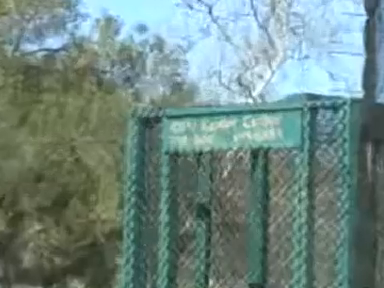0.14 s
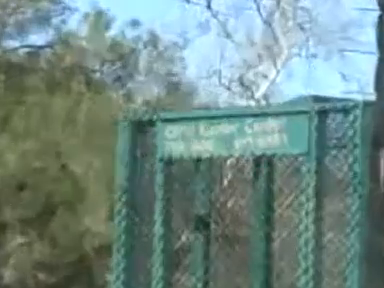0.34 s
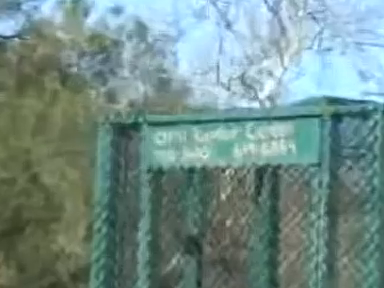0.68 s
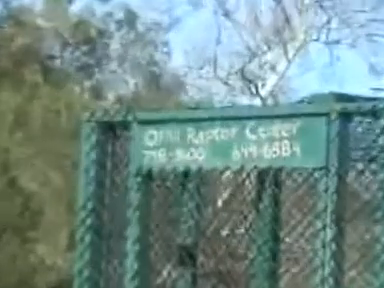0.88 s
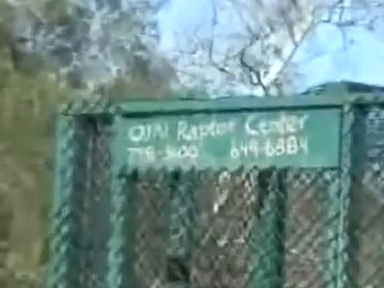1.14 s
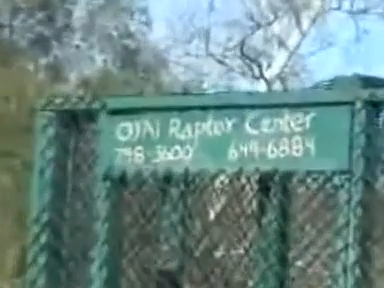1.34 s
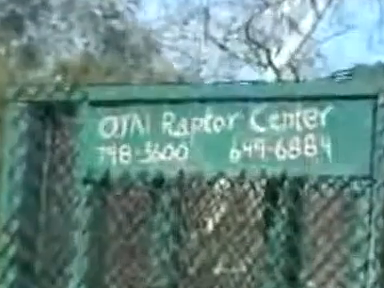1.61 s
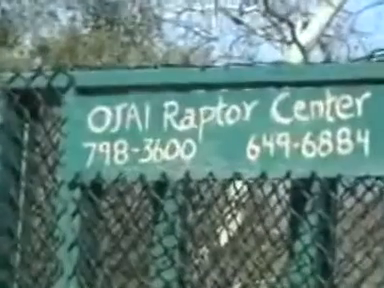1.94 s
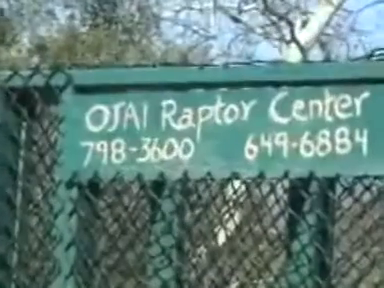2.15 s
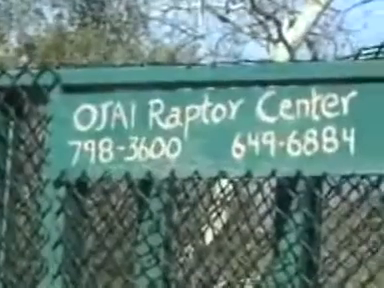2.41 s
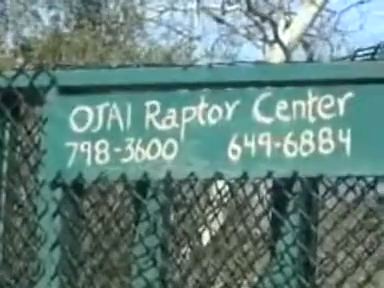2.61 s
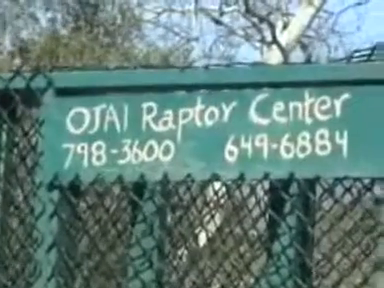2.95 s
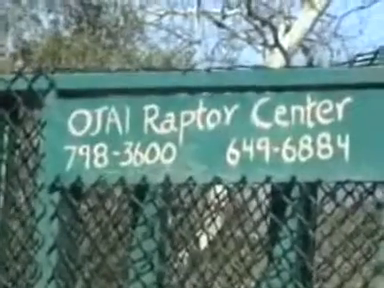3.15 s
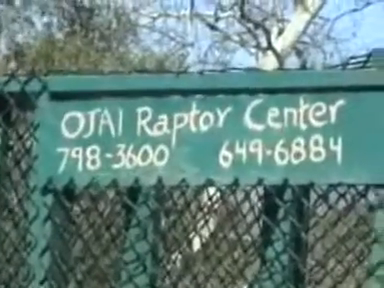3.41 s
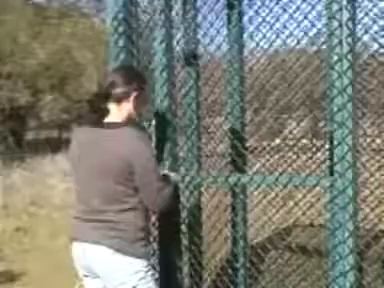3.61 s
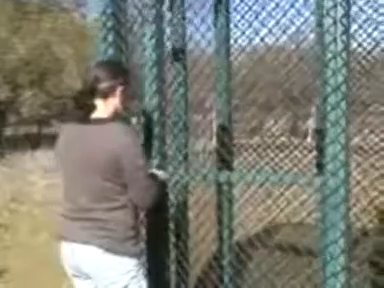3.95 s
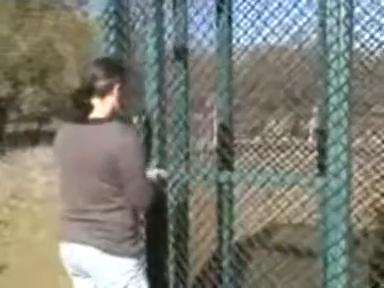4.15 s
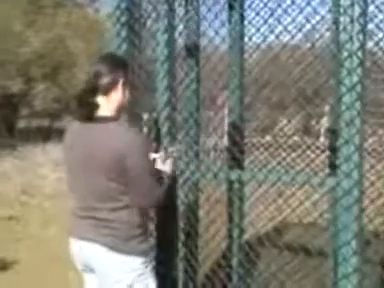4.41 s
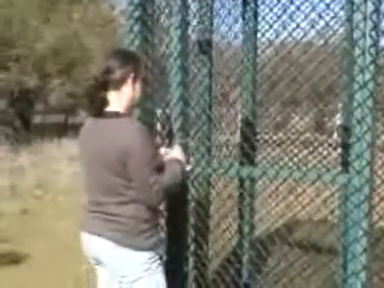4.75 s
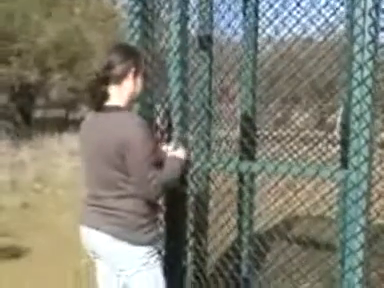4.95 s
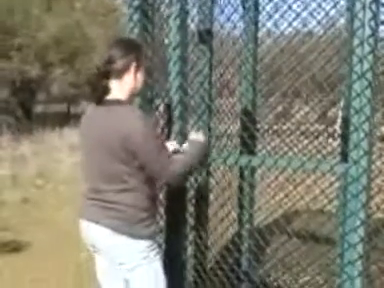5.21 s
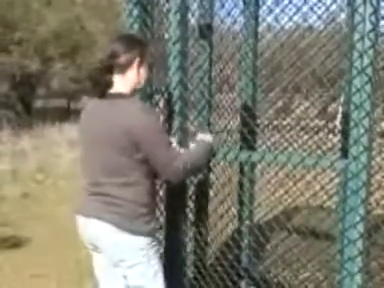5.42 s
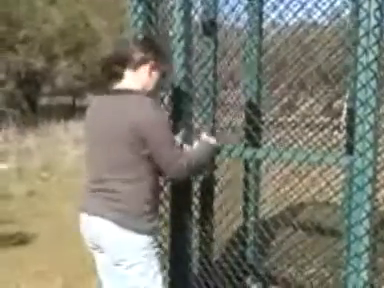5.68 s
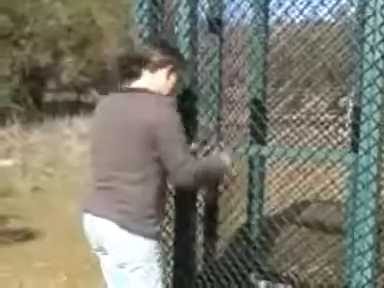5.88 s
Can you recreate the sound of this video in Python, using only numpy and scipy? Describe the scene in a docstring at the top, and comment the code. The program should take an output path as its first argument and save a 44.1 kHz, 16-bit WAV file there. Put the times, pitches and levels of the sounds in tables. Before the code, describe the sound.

Outdoors, a small camera microphone picks up steady hiss and a faint wavering motor hum. A steel frame bumps out of sight, then slams loudly, with tiny metallic ticks after. Following a quiet gap, a nearby latch clanks in a quick bright cluster, with small bolt pings and shivering wire mesh. A lull with low wind buffeting follows, then lighter clicks and rattles as the chain-link door moves.

```python
"""A steel-framed door bumps and slams out of sight among chain-link cages outdoors, and small things tick;
then a hand works a latch and the door rattles open. Each blow is filtered noise that also rings steel modes,
the bolt pings as decaying sines and the handled mesh shivers as uneven noise. Wind buffets the microphone and
rustles nearby as shaped noise; the camcorder's own motors hum as wavering sines over its hiss."""
import sys
import numpy as np
from scipy import signal
from scipy.fft import rfft, irfft
from scipy.io import wavfile
from scipy.ndimage import uniform_filter1d

SR = 44100
rng = np.random.default_rng(int(sys.argv[2]) if len(sys.argv) > 2 else 0)


def persist_wave(psi):
    """Save psi, clipped to +-1, as 16-bit WAV."""
    counts = np.round(np.clip(psi, -1, 1) * 32767).astype(np.int16)
    wavfile.write(sys.argv[1], SR, np.atleast_2d(counts).T)


N = 267201
T = np.arange(N) / SR
OPPOSITE = np.array([[1], [-1]])  # adds to the left, subtracts from the right: widens the image

# resonances of the steel latch: f/Hz, level/dB (relative), t60/s
LATCH_MODES = [(810, 0, .06), (1480, 5, .06), (1870, 2, .06), (2090, 1, .06), (2780, 0, .05),
               (3340, 0, .05), (3880, 4, .05), (4760, -3, .04), (6120, 2, .04), (7150, 0, .04),
               (7900, 3, .05)]


def undb(db):
    """Amplitude ratio of a level in dB."""
    return 10 ** (np.asarray(db) / 20)


def unit(x):
    """Scale to rms 1."""
    return x / np.sqrt(np.mean(x ** 2))


def curve(table):
    """Columns of a time table, interpolated to one value a sample."""
    s, *columns = np.transpose(table)
    return [np.interp(T, s, c) for c in columns]


def noise(colour):
    """Noise of rms 1 whose spectrum follows (f/Hz, level/dB) points on a log frequency axis."""
    hz, db = np.transpose(colour)
    f = np.maximum(np.arange(N // 2 + 1) * SR / N, 1)
    gain = undb(np.interp(np.log(f), np.log(hz), db))
    return unit(irfft(rfft(rng.standard_normal(N)) * gain, N))


def walk(rate):
    """Random levels, each held 1 / rate s and smoothed twice; spread near 1."""
    k = int(SR / rate)
    steps = np.repeat(rng.standard_normal(N // k + 1), k)
    return 1.66 * uniform_filter1d(uniform_filter1d(steps, k), k)[:N]


def fade(t, t60):
    """Exponential decay that falls 60 dB in t60 seconds."""
    return np.exp(-np.log(1000) * t / t60)


def mode_rings(modes, t):
    """One decaying sine a row for each resonance (f/Hz, level/dB, t60/s)."""
    hz, db, t60 = (c[:, None] for c in np.transpose(modes))
    return undb(db) * np.sin(2 * np.pi * hz * t) * fade(t, t60)


def spells(starts, holds, levels_db, rise, fall_db_s):
    """Summed gain of swells that rise, hold and die away at a steady rate in dB/s."""
    since = T - np.array(starts)[:, None]
    falling = np.maximum(since - rise - np.array(holds)[:, None], 0)
    shape = np.clip(since / rise, 0, 1) ** 2 * undb(-fall_db_s * falling)
    return undb(levels_db) @ shape


def wires(t, t60, count=40):
    """Short rings of whichever mesh wires a blow happens to reach."""
    hz, size = 700 * 12 ** rng.random((count, 1)), rng.standard_normal(count)
    return size @ (np.sin(2 * np.pi * hz * t) * fade(t, t60))


def grinding_contacts(length, blunt, knock_share, knock_db):
    """Many small contacts with lone hard knocks that all push the same way, in chattering strength."""
    knocks = (rng.random(length) < knock_share) * rng.exponential(size=length)
    contacts = signal.lfilter(*blunt, rng.standard_normal(length) + undb(knock_db) * knocks)
    chatter_db, held = 1.8, int(.003 * SR)  # spread; samples each strength is held
    chatter = undb(chatter_db * rng.standard_normal(length // held + 1))
    return contacts * np.repeat(chatter, held)[:length]


def struck(events, modes, edges_hz, bands_db, rise, ring_db, wire_db, knock_db, knock_share, tail_db, tail_t60,
           damping, blunt_hz, soft, crack, struck_part, grit):
    """Each blow is a flurry of contacts that crack and ring the steel; the bass lasts longer, the treble less."""
    t = np.arange(SR // 3) / SR
    rings = mode_rings(modes, t)
    (crack_db, crack_t60), (part_db, part_t60), (grit_db, grit_top_hz) = crack, struck_part, grit
    blunt = signal.butter(1, blunt_hz, fs=SR)  # a contact takes time, which dulls its top
    dull = signal.butter(2, grit_top_hz, fs=SR)
    spans = list(zip(edges_hz, edges_hz[1:]))
    bands = [signal.butter(4, span, "band", fs=SR, output="sos") for span in spans]
    swell, after = np.minimum(t / rise, 1) ** 2, np.maximum(t - rise, 0)
    octaves_up = np.maximum(np.log2(np.transpose(modes)[0] / 2000), 0)  # above 2 kHz
    out = np.zeros(N + len(t))
    for s, blow_db, bass_db, bright_db, decay, part_hz in events:
        contacts = grinding_contacts(len(t), blunt, knock_share, knock_db)
        decay = max(decay, .01)
        # every blow lands on another spot and wakes another mix of modes
        mix_db = ring_db + soft * blow_db * octaves_up + 2 * rng.standard_normal(len(modes))
        body = undb(mix_db) @ rings
        body[:SR // 15] += undb(wire_db) * wires(t[:SR // 15], .03)
        body += undb(part_db) * np.sin(2 * np.pi * part_hz * t) * fade(t, part_t60)
        drive = .6 * contacts * swell * fade(after, decay)
        # the main contact carries as much energy as all the rest
        drive[int(rise * SR)] += np.sqrt(np.sum(drive ** 2))
        ring = signal.fftconvolve(drive, body)[:len(t)]
        i = int((s - 0.64 * rise) * SR)
        # a bright blow gains more in each band above the middle one
        upper_db = np.array(bands_db) + bright_db * np.arange(len(bands_db))
        for band, (low, high), band_db in zip(bands, spans, (bass_db, *upper_db)):
            stretch = (low / edges_hz[1]) ** -damping
            envelope = fade(after, decay * stretch) + undb(crack_db) * fade(after, crack_t60)
            # the mesh keeps shaking faintly after the blow
            envelope += undb(tail_db) * fade(t, tail_t60 * stretch)
            grinding = contacts * swell * envelope
            if high == edges_hz[-1]:
                grinding = undb(grit_db) * signal.lfilter(*dull, grinding)
            part = signal.sosfilt(band, grinding + ring)
            head = int((.022 + 5 / low) * SR)  # low bands take longer to speak
            head_rms = np.sqrt(np.mean(part[:head] ** 2))
            out[i:i + len(t)] += undb(blow_db + band_db) * part / head_rms
    return out[:N]


def door():
    """Bumps and slams of the steel frame, dulled by distance; soft blows hardly wake the high modes."""
    # blows on the frame: t/s, level/dB, bass/dB (re level), brightness/dB per band,
    # t60/s (in the middle band), f/Hz of the part struck
    bumps = [(1.135, -32.5, -10, -5, 0.16, 555), (1.176, -34, -11, 0, 0.14, 726),
             (1.236, -14, -11, -1, 0.065, 760), (1.251, -19.5, -11.5, -1, 0.091, 159),
             (1.283, -27.5, -7, 1.5, 0.47, 710), (1.334, -21, -21, 0, 0.12, 610),
             (1.711, -22.5, -12, -1.5, 0.14, 544), (1.779, -37.5, -24, 2.5, 0.16, 1870),
             (1.928, -39, -11, 3.5, 0.19, 1850), (1.95, -43.5, -6.5, 3, 0.19, 2200),
             (2.4095, -2, -20, 0, 0.17, 1055), (2.439, -8, -19, -29, 0.28, 1040),
             (2.569, -33.5, -6.5, 1.5, 0.35, 645), (2.638, -45.5, -16, 7.5, 0.23, 3390),
             (2.715, -45.5, -12, -5, 0.062, 960), (2.814, -42, -6.5, -5, 0.24, 860),
             (2.878, -47, -1, 1, .3, 990)]
    # resonances of the frame: f/Hz, level/dB (relative), t60/s
    frame_modes = [(187.5, 8, 0.08), (580, 2, 0.12), (760, 4, 0.1), (1010, 4, 0.07), (1250, 7, 0.07),
                   (1430, 2, .09), (1830, 6, .07), (2120, 4, .06), (2860, 11, .05), (3190, 18, .085),
                   (3800, 17, .085), (3970, 16, .085), (4220, 14, .085), (4760, 19, .085), (5450, 21, .04),
                   (5680, 24, .08), (6030, 23, .085), (6600, 26, .07), (6860, 24, .09)]
    blows = struck(
        bumps, frame_modes, edges_hz=(140, 300, 1400, 2400, 6800),
        bands_db=(-12.5, -15, -21),  # middle, upper and treble re blow level
        rise=0.013, ring_db=-46.5, wire_db=-55, knock_db=16.5, knock_share=0.0085,
        tail_db=-20.5, tail_t60=0.31, damping=0.26, blunt_hz=2940,
        soft=2.0,  # dB lost per dB of softness and octave above 2 kHz
        crack=(-16.5, 0.0065),  # dB over the grinding, t60 in s
        struck_part=(-33, .045),  # dB, t60 in s
        grit=(-13, 3600))  # grinding left in the treble band: dB, top in Hz
    far = signal.sosfilt(signal.butter(6, 7000, fs=SR, output="sos"), blows)
    # a faint dull copy, 90 samples late, with opposite signs, widens the blows
    late = signal.sosfilt(signal.butter(1, 900, fs=SR, output="sos"), np.roll(far, 90))
    return far + undb(-20.0) * late * OPPOSITE


def latch():
    """Clanks, ticks and rattles: short bright blows on the latch and the door it holds."""
    # blows: t/s, level/dB, bass/dB (re level), brightness/dB per band,
    # t60/s (in the middle band, at least 0.01), f/Hz of the part struck
    clanks = [(1.693, -35.5, -8, 2.5, 0.33, 2520), (2.0817, -27, -36, 1, 0.016, 1905),
              (2.142, -38.5, -13, -0.5, 0.03, 1930), (2.267, -42.5, -16, -5, 0.076, 1300),
              (2.578, -43.5, -2.5, 8, 0.15, 5555), (3.2, -45.5, -25, -15, 0.032, 1180),
              (3.255, -46, -12.5, -17, .04, 1160), (3.2809, -42, -27, -12, 0.072, 1170),
              (3.3062, -48.5, -11, 9, 0.14, 7120), (3.3563, -41.5, -25, -20, 0.095, 1180),
              (3.4162, -40.5, -20, -17, 0.0088, 1130), (3.5822, -40, -26.5, -11.5, 0.022, 1380),
              (3.8043, -40, -16, -7, 0.14, 1670), (3.9634, -18, -14, -5, 0.17, 3000),
              (3.978, -24.5, -4, 1.5, 0.12, 850), (4.095, -22.5, -15.5, -4, 0.18, 2240),
              (4.118, -11.5, -12.5, 2, 0.077, 1490), (4.1343, -7.5, -34, 1, 0.066, 3770),
              (4.1799, -25, -17, 2.5, 0.087, 1720), (4.2325, -25, -22, -0.5, 0.035, 2860),
              (4.2784, -27.5, -32, -3, 0.1, 1980), (4.3074, -41.5, 0.5, 4.5, 0.16, 664),
              (4.4136, -13, -22, -1, 0.16, 2200), (4.442, -22, -16, 2, 0.07, 2270),
              (4.457, -12.5, -22.5, -3.5, 0.093, 1600), (4.5117, -30.5, -11.5, 2.5, 0.2, 1950),
              (4.5285, -17.5, -40, 0, 0.042, 1860), (4.6155, -24, -16, 4.5, 0.073, 6910),
              (4.816, -28, -27, -4, 0.069, 1520), (5.3218, -35, -33, -2, 0.013, 1310),
              (5.443, -32, -19, 2.5, 0.077, 4040), (5.4809, -36, -19, -2, .04, 2320),
              (5.4959, -35, -7.5, 3.5, 0.045, 655), (5.5207, -43, -5, 4, 0.097, 590),
              (5.5776, -27.5, -17, 1, 0.17, 2640), (5.609, -20.5, -23, -1.5, 0.07, 1880),
              (5.6767, -44, -1, 5.5, 0.038, 580), (5.704, -38, -16, -3, 0.042, 1880),
              (5.7389, -32, -10, -0.5, 0.053, 645), (5.7499, -25.5, -27, -2.5, 0.16, 3970),
              (5.8364, -48, -14, 3, 0.11, 3865), (5.8511, -20.5, -38, -2, 0.067, 1530),
              (5.9606, -29.5, -20, 3.5, 0.023, 3650), (5.9984, -44, -24, -7, 0.039, 3670),
              (6.0114, -31, -12, 4, 0.011, 1350), (6.0287, -30.5, -12.5, -7, 0.09, 1620),
              (6.0494, -22.5, -17, -5, 0.27, 1010)]
    return struck(
        clanks, LATCH_MODES, edges_hz=(450, 1000, 2500, 5000, 9000), bands_db=(-14, -13.5, -16),
        rise=.0048, ring_db=-36.5, wire_db=-42, knock_db=11.5, knock_share=.012,
        tail_db=-29.0, tail_t60=1.0, damping=0.044, blunt_hz=5360,
        soft=0, crack=(0.57, 0.015), struck_part=(-27, .035), grit=(-3, 12000))


def bolt():
    """Clean short rings of the latch's small steel bolt, each blow with its own mix of modes."""
    # pings: t/s, level/dB
    pings = [(4.117, -36), (4.415, -27), (4.443, -32), (4.613, -27.5)]
    # resonances of the bolt: f/Hz, level/dB (relative), t60/s
    bolt_modes = [(5463, 0, .14), (5420, -11, .1), (6900, -7, .06), (3840, -8, .04)]
    t = T[:SR // 3]
    rings = mode_rings(bolt_modes, t)
    out = np.zeros(N)
    for s, ping_db in pings:
        mix = undb(ping_db + 1.5 * rng.standard_normal(len(bolt_modes)))
        i = int(s * SR)
        out[i:i + len(t)] += mix @ rings
    return out


def shiver():
    """Dense tiny wire clicks of uneven size while the door is handled; they also ring the latch a little."""
    # spells of handling that set the loose mesh shivering: start/s, hold/s, level/dB
    handling = [(3.93, 0.12, -40.5), (4.1, 0.011, -28), (4.276, 0.1, -40.5), (5.55, 0.29, -49.5),
                (5.778, 0.1, -47), (5.968, 0.094, -35.5)]
    sizes = np.repeat(undb(2.5 * rng.exponential(size=N // 40 + 1)), 40)[:N]
    wire = unit(sizes * noise([(300, 0.5), (800, 1.5), (2000, 4.5), (4500, 0.5), (8500, -12.5)]))
    latch_ring = np.sum(mode_rings(LATCH_MODES, T[:SR // 10]), axis=0)
    ring = signal.fftconvolve(wire, latch_ring)[:N]
    both = wire + undb(-5) * unit(ring)
    return both * undb(2.0 * walk(30)) * spells(*np.transpose(handling), rise=0.036, fall_db_s=133)


def wind():
    """Eddies buffet the two microphone ports, partly alike and harder on the right, while deep thumps sound
    beneath them."""
    # gusts on the microphone: start/s, hold/s, level/dB
    gusts = [(0.136, 0.01, -51), (0.956, 0.023, -47), (1.176, 0.12, -40.5), (1.688, 0.11, -47.5),
             (2.02, 0.1, -51.5), (2.537, 0.12, -49.5), (2.81, 0.15, -56), (3.74, 0.21, -55),
             (3.994, 0.035, -35.5), (4.095, 0.11, -31), (4.279, 0.079, -34), (5.022, 0.034, -44.5),
             (5.096, 0.21, -35.5), (5.408, 0.053, -44), (5.56, 0.17, -52.5)]
    # deep thumps, felt more than heard: start/s, level/dB
    thumps = [(.96, -45), (1.219, -24), (1.7, -45), (2.1, -52), (2.44, -38), (2.7, -48.5), (2.95, -50),
              (4.0, -52), (4.319, -40), (5.052, -38.5), (5.2, -47), (5.48, -49)]
    # spectra of the buffeting and of the thumps: f/Hz, level/dB (relative)
    buffet_colour = [(35, -43.5), (60, 8.5), (120, 1), (200, -6.5), (350, -28.5), (700, -77)]
    thump_colour = [(12, -25.5), (30, 20), (45, 26.5), (80, -25), (200, -90)]
    calm_db, calm_thump_db = -55, -66.5  # levels between the gusts
    strength = undb(calm_db) + spells(*np.transpose(gusts), rise=0.032, fall_db_s=212)
    starts, thump_db = np.transpose(thumps)
    holds = np.full(len(starts), 0.065)
    depth = undb(calm_thump_db) + spells(starts, holds, thump_db, rise=0.01, fall_db_s=104)
    apart = 0.34 * OPPOSITE  # share that differs between the ports
    flutter = undb(2.2 * walk(24.87))
    buffet = strength * flutter * (noise(buffet_colour) + apart * noise(buffet_colour))
    thump = depth * (noise(thump_colour) + .5 * apart * noise(thump_colour))
    return (buffet + thump) * undb([[-1.6], [1.6]])


def rustle():
    """Wind rustling nearby: a soft rush of noise over a dull drone near 300 Hz, each wavering in level."""
    # level of the background: t/s, rush level/dB, drone level/dB
    background = [(0, -63, -63), (1.1, -83, -66), (1.45, -59, -49.5), (2.3, -63, -57), (2.65, -56.5, -51),
                  (3.2, -66, -49.5), (3.76, -67, -53.5), (3.83, -49, -64), (4.15, -49, -40.5),
                  (4.55, -52, -76), (5.3, -48, -55.5), (6.06, -45.5, -65)]
    # spectrum of the rush: f/Hz, level/dB (relative)
    rush_colour = [(150, -38.5), (300, 1), (700, 15), (1100, 9.5), (2000, 1), (4000, -54.5)]
    rush_db, drone_db = curve(background)
    drone_colour = [(200, 3.5), (280, 0.5), (310, 10.0), (355, 4.5), (450, -31.0)]
    drone = noise(drone_colour) + 0.2 * noise(drone_colour) * OPPOSITE
    rush = noise(rush_colour) + 0.073 * noise(rush_colour) * OPPOSITE
    return rush * undb(rush_db + 2.0 * walk(20.63)) + drone * undb(drone_db + 2.0 * walk(2.8))


def camcorder():
    """Wavering motor tones, louder on the right, over a hiss that differs between the channels."""
    # motor tones: f/Hz, level/dB (rms, before the drop and the channel balance)
    motor = [(72.5, -67.5), (145, -56), (361, -69), (749, -73.5), (2826, -71.5)]
    # spectra of the hiss and of its part unlike left and right: f/Hz, level/dB (relative)
    hiss_colour = [(120, -7.5), (200, -16.5), (269, 7), (445, 1), (488, 3.5), (757, 0.5), (1140, -4),
                   (2490, -4.5), (2820, -3.5), (8450, -10.5), (11000, -104)]
    apart_colour = [(150, -25.5), (300, -3.5), (1000, -12.5), (2500, -13), (5000, -5.5), (8500, -15.5)]
    turns = T + 0.00025 * walk(11.0)  # shaft angle as time, running a little unevenly
    tones = np.zeros(N)
    for hz, db in motor:
        tones += np.sqrt(2) * undb(db + 2.5 * walk(8.5)) * np.sin(2 * np.pi * hz * turns)
    drop = undb(-3 * (T > 3.4))  # the hum steps 3 dB down at 3.4 s
    hiss = noise(hiss_colour) + undb(-4.0) * noise(apart_colour) * OPPOSITE
    return tones * drop * undb([[-1.1], [1.1]]) + undb(-55.5 + 1.1 * walk(3.4)) * hiss


def scene():
    """Door and latch in front, then the small metal, the wind and the camcorder."""
    return door() + latch() + bolt() + shiver() + wind() + rustle() + camcorder()


def record(dry):
    """The loudest peaks round off just under full scale and the top is cut above 8600 Hz."""
    rounded = .93 * np.tanh(dry / .93)
    return signal.sosfilt(signal.ellip(10, .3, 80, 8600, fs=SR, output="sos"), rounded)


dry = scene()
out = record(dry)
persist_wave(out)
```